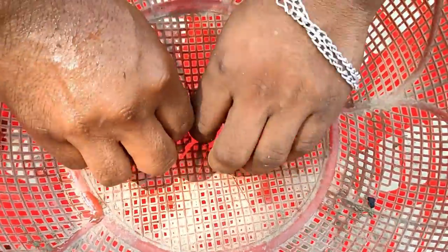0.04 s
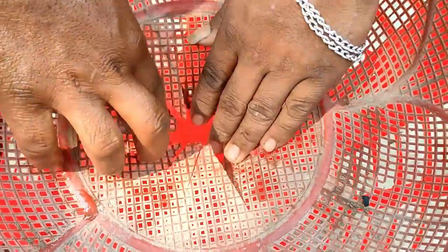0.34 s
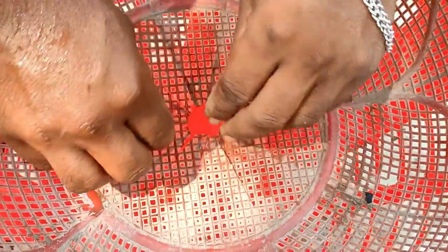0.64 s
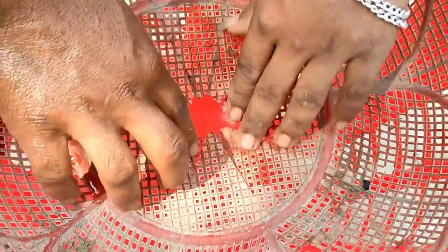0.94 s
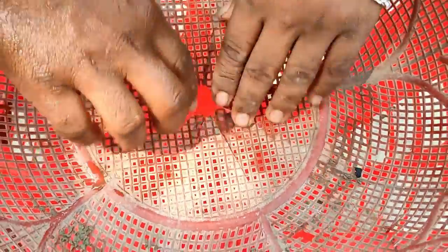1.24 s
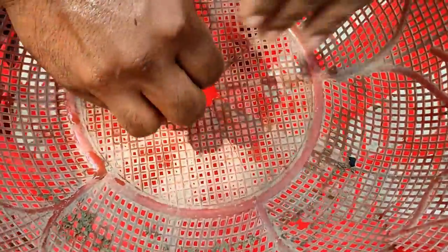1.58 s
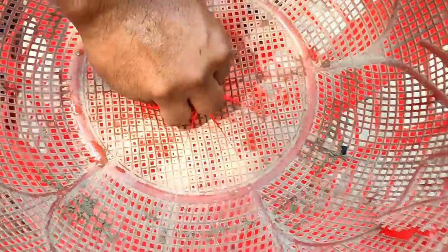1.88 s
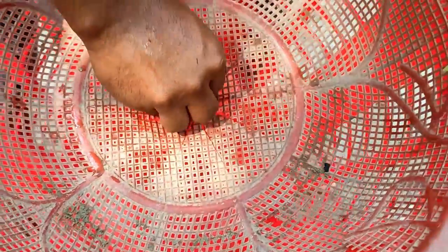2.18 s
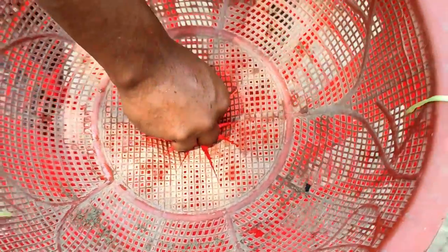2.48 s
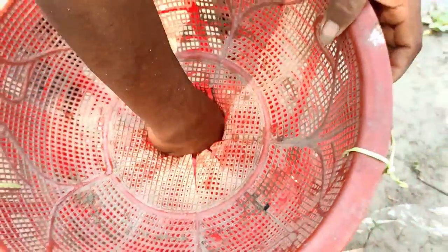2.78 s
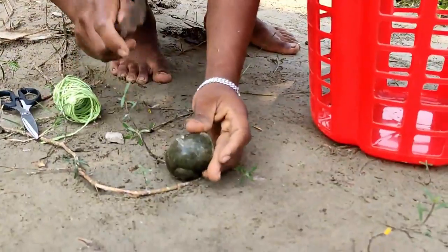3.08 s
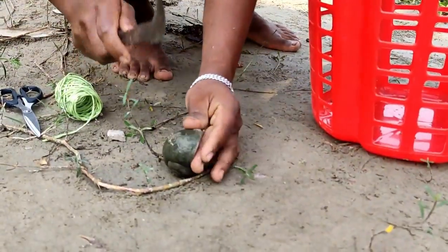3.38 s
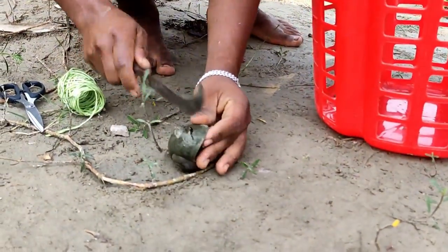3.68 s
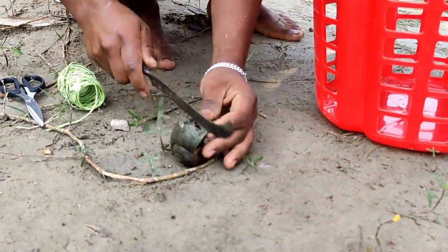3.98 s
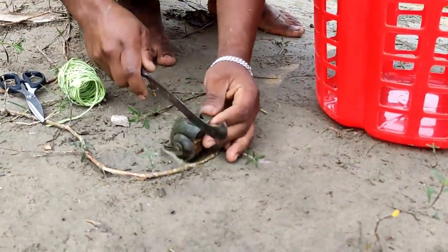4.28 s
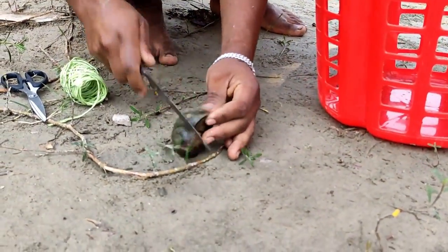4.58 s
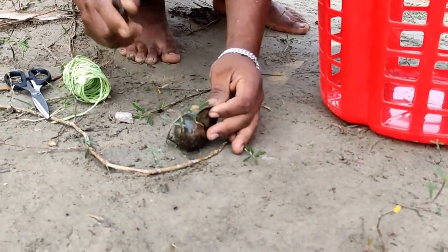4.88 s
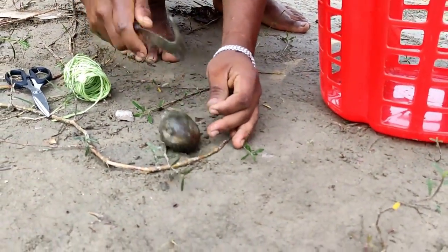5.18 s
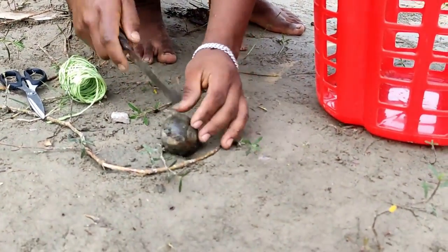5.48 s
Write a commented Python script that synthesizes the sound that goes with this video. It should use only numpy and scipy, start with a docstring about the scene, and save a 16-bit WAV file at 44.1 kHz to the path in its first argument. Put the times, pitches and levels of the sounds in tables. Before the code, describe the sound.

A hand brushes over the mesh of a plastic basket while snail shells click, scrape and bump inside it. Then a knife strikes a shell on bare earth six times at an even pace, each blow a loud, sharp crack with a brief ring and a thud. A few light ticks follow. The action is close to the microphone, outdoors, over a low murmur, a few faint birds and one faint, distant horn.

```python
"""First a hand rummages in a plastic basket for a snail shell: it brushes the mesh, and shells click,
scrape and bump. A far horn sounds as the hand lifts the shell out. From about 3 s a knife strikes the
shell six times on bare earth: each blow is a burst of tiny fractures, a short ring, a thud and a bright
fading tail. The shell scuffs the soil between the later blows. Last come two bright ticks of shell chips
and two light touches of the blade. Behind it all lie a low outdoor murmur and a few faint birds."""
import sys
import numpy as np
from scipy import signal
from scipy.fft import rfft, irfft
from scipy.io import wavfile
from scipy.ndimage import uniform_filter1d

SR = 44100
rng = np.random.default_rng(int(sys.argv[2]) if len(sys.argv) > 2 else 0)


def bounce(signal):
    """Save signal as a 16-bit WAV file at the path given by the first command-line argument."""
    frames = np.transpose(np.atleast_2d(signal))
    limited = np.clip(frames, -1, 1)
    pcm = np.round(limited * 32767).astype(np.int16)
    wavfile.write(sys.argv[1], SR, pcm)


N = 244314

# tone of the basket's clicks, also the starting tone of every scrape: pitch_hz, level_db
KNOCK_TONE = [(40, -23.5), (120, 13), (280, 9.5), (420, 9.5), (550, 8.5), (750, 1.5), (1250, 4.5),
              (2400, -4), (4000, 0), (7000, -12), (12000, -6.5), (16000, -19.5)]


def knife_blows(lead_s=.012, give_s=0.00162, give_db=-11, scatter_db=-27, scatter_s=0.0191,
                uneven_db=2.5, thud_s=0.00238, chips_db=-18):
    """The shell gives way, cracks and rings; the earth under it thuds and the surroundings echo."""
    # each blow: start_s, crack_db, crumble_s, hollow_db, low_hz and high_hz (favoured by the struck spot),
    # ring_db, thud_db, thud_hz, thud_pan_db, tail_db, dullness (on the right, 0 to 1)
    strikes = [(3.0858, -1.16, 0.002547, 5.5, 1202, 11610, -3, -10.5, 108, 6, -2.5, 0),
               (3.4295, 1, 0.00427, 0.5, 1720, 11670, -1, -9, 102, 7, -1.5, 0.035),
               (3.7893, 1.85, 0.00272, -4, 1896, 6900, -4, -16, 135, 9, -7.5, 0.319),
               (4.1175, 2.5, 0.00283, -8, 2901, 3052, 0, -15.5, 140, 19, -6.5, 0.72),
               (4.4438, 1.67, 0.00398, 1.5, 1374, 2538, -2, -18.5, 135, 14, -6, 0.89),
               (4.7856, -2.5, 0.0035, 0, 1415, 2197, 3, -15.5, 150, 10, -4, 1)]
    # tone of a fracture: pitch_hz, level_db
    crack_tone = [(60, -30.5), (250, 14), (480, 4), (800, 14), (1900, 9), (2600, 8.5), (3800, 8.5),
                  (5200, 11.5), (7500, 10), (10000, 8.5), (16000, -1)]
    # tone on each side: pitch_hz, left_db, right_db, dulling_db (added on the right at full dullness)
    side_tone = [(300.6, 1.5, 4, -1.5), (755, -2, -1.5, 5.5), (1305, -1.5, -3, 4), (2860, 0.5, 0.5, 4),
                 (4900, 0.5, 1.5, -3), (7290, -1.5, 4, -21.5), (8760, 9, -7.5, -7.5), (10260, -4, 8, -32),
                 (12560, 2.5, 13, -41.5), (16100, 2, 6, 5)]
    out = np.zeros((2, N))
    t = np.arange(SR * 3 // 5) / SR - lead_s  # zero is the moment the shell breaks
    early = t[:SR // 12]
    for (start_s, crack_db, crumble_s, hollow_db, low_hz, high_hz,
         ring_db, thud_db, thud_hz, thud_pan_db, tail_db, dullness) in strikes:
        giving = gain_of(give_db) * np.exp(-abs(early) / give_s)
        crumbling = np.exp(-abs(early) / crumble_s) + gain_of(scatter_db) * np.exp(-abs(early) / scatter_s)
        crack = burst(np.where(early < 0, giving, crumbling))
        crack = np.pad(crack, ((0, 0), (0, len(t) - len(early))))
        chips = colour(falling_chips(t, chips_db + tail_db), lambda f: 20 * (treble(f, 2000) - 1))
        hit = crack + echo_tail(crack, tail_db) + chips
        hit = colour(hit, lambda f: crack_db + look_up(crack_tone, f) + uneven_db * treble_ripple(f))
        hit += gain_of(ring_db) * shell_ring(t, low_hz, high_hz)

        def sides_db(f):
            left = look_up(side_tone, f)
            right = look_up(side_tone, f, column=2) + dullness * look_up(side_tone, f, column=3)
            return hollow_db * hump(f, centre_hz=1051.2, octaves=0.662) + np.array([left, right])

        thud = -np.sin(2 * np.pi * thud_hz * t) * np.exp(-abs(t) / thud_s)
        add(out, start_s - lead_s, colour(hit, sides_db) + gain_of(thud_db) * panned(thud_pan_db) * thud)
    return out


def shell_ring(t, low_hz, high_hz, favour_db=8, spot_octaves=0.0346):
    """The shell rings at its own pitches; those that the struck spot favours get a boost."""
    # the shell's own notes: pitch_hz, level_db, fade_s (time to fall by 60 dB)
    notes = [(194.7, -30.5, 0.0598), (751.1, -26, 0.0295), (1222.3, -25.5, 0.0222), (1350.5, -28, 0.0517),
             (1728.3, -35, 0.036), (1888.4, -36.5, 0.099), (2212.6, -27, 0.0316), (2512, -22.5, 0.0333),
             (2967, -26, 0.0393), (3235, -25.5, 0.02838), (3539, -41.5, 0.053), (4804, -28.5, 0.054),
             (5080, -40.5, .04), (6840, -38, .045), (8699, -30, .02), (9940, -37.5, .04), (10570, -40, .04),
             (11846, -33.5, 0.045), (12294, -30, 0.0256)]
    hz, db, fade_s = np.transpose(notes)[:, :, None]
    age = np.maximum(t, 0)
    favour = hump(hz, low_hz, spot_octaves) + hump(hz, high_hz, spot_octaves)
    level = gain_of(db + favour_db * favour) * fade(age, fade_s) * (t > 0)
    # low notes reach both sides in step, high notes do not
    phase = rng.random((len(notes), 1))
    side_shift = rng.uniform(-0.765, 1, (2, len(notes), 1)) * np.minimum(hz / 9000, .5)
    return (level * np.sin(2 * np.pi * (hz * age + phase + side_shift))).sum(1)


def treble_ripple(hz, width_hz=130, above_hz=3000):
    """Narrow random peaks and dips that make each crack's treble uneven."""
    points_hz = np.arange(0, SR, width_hz)
    heights = evened(rng.standard_normal(SR // 50 + 1))[:len(points_hz)]
    return np.interp(hz, points_hz, heights) * treble(hz, above_hz)


def falling_chips(t, db, per_s=260, peak_s=0.03525):
    """Tiny chips of shell patter down after a blow."""
    clicks = rng.standard_normal((2, len(t))) * (rng.random(len(t)) < per_s / SR)
    chips = clicks * np.maximum(t, 0) * np.exp(-t / peak_s)
    return gain_of(db) * chips / (np.linalg.norm(chips[0]) + 1e-12)


def echo_tail(hit, tail_db, rise_s=0.014):
    """Scattered copies of a blow gather into a bright tail whose treble dies first."""
    # the tail's tone and length: pitch_hz, level_db, fade_s (time to fall by 60 dB)
    bands = [(201.6, -30, 0.68), (1300.7, -19, 0.42), (2638, -5.5, 0.439), (5120, -12.5, 0.445),
             (9044, -11, 0.419), (15000, -10.5, 0.318)]
    size = hit.shape[1]
    hz, times, spectrum = signal.stft(grains(size, 2.5), SR, nperseg=256)
    spectrum *= fade(times, look_up(bands, hz, column=2)[:, None])
    tail = signal.istft(spectrum, SR, nperseg=256)[1][:, :size]
    tail *= 1 - np.exp(-np.arange(size) / SR / rise_s)
    tail = colour(tail / np.linalg.norm(tail[0]), lambda f: look_up(bands, f) + tail_db)
    return signal.fftconvolve(hit, tail, axes=1)[:, :size]


def light_ticks(click_db=-3, click_s=0.0034, away_db=-24):
    """Two bright ticks of shell chips, then two light touches of the blade; each clicks and rings."""
    # each tick: start_s, level_db, low_hz and high_hz (the favoured pitches), reach_octaves
    ticks = [(4.861, -22, 8650, 8650, .6), (4.901, -20, 8650, 9900, .8), (5.0646, -28, 3263, 3254, .4),
             (5.228, -15, 1300, 2400, 2.2)]
    out, t = np.zeros((2, N)), np.arange(SR // 8) / SR
    for start_s, db, low_hz, high_hz, reach_octaves in ticks:
        tick = shell_ring(t, low_hz, high_hz) + gain_of(click_db) * burst(np.exp(-t / click_s))
        middle_hz = np.sqrt(low_hz * high_hz)
        add(out, start_s, colour(tick, lambda f: db + away_db * (1 - hump(f, middle_hz, reach_octaves))))
    return out


def basket_taps(click_s=0.00372, rise_s=0.000474, rattle_db=-19, rattle_s=0.01822,
                knock_hz=280, knock_db=-18, pan_db=-0.04):
    """Shells click on the mesh, with a brief rattle and a soft knock of the basket's floor."""
    # each click: start_s, level_db, treble_db
    taps = [(.065, -10, 1), (.109, -5.5, -15), (.152, -12.5, 3.5), (.197, -22, 9.5), (.26, -5, -15.5),
            (.358, -19.5, 8), (.385, -15, 15.5), (.414, 1.5, 7.5), (.423, 0, -9), (.775, -4.5, -2.5),
            (.807, -9, 12), (.894, -11.5, 8.5), (.905, -9, -5), (1.0327, -33, 36), (1.2131, -10.5, -9),
            (1.364, -14, 1.5), (1.38, -14, 3), (1.686, -8.5, 1), (1.815, -9.5, -23.5), (1.858, -10, -14),
            (2.043, -11.5, -10), (2.444, -7.5, -0.5), (2.8277, -9, 1.5)]
    out, t = np.zeros((2, N)), np.arange(SR // 8) / SR
    dying = np.exp(-t / click_s) + gain_of(rattle_db) * np.exp(-t / rattle_s)
    envelope = dying * (1 - np.exp(-t / rise_s))
    for start_s, db, treble_db in taps:
        def tone_db(f):
            # the mesh yields, so light and hard taps push its floor about equally
            floor_db = (knock_db - db) * hump(f, knock_hz, octaves=1)
            return db + look_up(KNOCK_TONE, f) + floor_db + treble_db * treble(f)

        add(out, start_s, panned(pan_db) * colour(burst(envelope), tone_db))
    return out


def basket_bumps(rise_s=0.00121):
    """The basket's floor bends and rings briefly, at a pitch set by where it is pressed."""
    # each hollow bump: start_s, level_db, pitch_hz, fade_s (time to fall by 60 dB)
    bumps = [(0.109, -27.5, 134.4, 0.047), (.11, -31.5, 718, 0.032), (.112, -40.5, 370.3, 0.164),
             (.355, -34, 234.3, 0.116), (.435, -36, 548.4, 0.198), (.465, -33.5, 364, 0.115),
             (.778, -37, 498.6, 0.0557), (1.214, -24.5, 762, 0.0178), (1.245, -37.5, 537.4, 0.0696),
             (1.592, -32.5, 334.5, 0.0302), (1.70, -35.5, 530.4, 0.128), (1.816, -38, 497, 0.0565)]
    out, t = np.zeros((2, N)), np.arange(SR // 6) / SR
    for start_s, db, hz, fade_s in bumps:
        ring = np.sin(2 * np.pi * hz * t) * fade(t, fade_s) * (1 - np.exp(-t / rise_s))
        add(out, start_s, gain_of(db) * np.array([ring, ring]))
    return out


def scrapes():
    """A shell drags over the mesh and scuffs the soil; the blade skids off it once."""
    # shell on mesh: start_s, length_s, level_db, treble_db
    drags = [(0.045, 0.0995, -45, -3), (0.427, 0.0683, -32, 7), (0.897, 0.0376, -48.5, -8.5),
             (1.223, 0.0459, -38.5, 6.5), (1.68, 0.0751, -38, 3), (1.778, 0.133, -50.5, -27),
             (2.008, 0.172, -53, -17), (2.421, 0.0813, -44.5, -8), (2.76, 0.055, -50.5, 5.5)]
    # shell on soil: start_s, length_s, level_db
    scuffs = [(4.19, .09, -48), (4.287, 0.0962, -41), (4.379, .032, -39), (4.396, 0.0365, -30),
              (4.484, .073, -42), (4.578, 0.374, -50.5), (4.945, 0.1046, -47)]
    # blade on shell: start_s, length_s, level_db, treble_db, pan_db
    skid = (3.5, 0.0021, -32, 23, -8)
    out = np.zeros((2, N))
    for drag in drags:
        add_scrape(out, *drag, pan_db=0.62)
    for scuff in scuffs:
        add_scrape(out, *scuff, treble_db=-31.5, pan_db=-23)  # dull, and to the right
    add_scrape(out, *skid)
    return out


def add_scrape(mix, start_s, length_s, db, treble_db, pan_db, ridges_per_s=140, catch=.7):
    """Many tiny slips catch on ridges, swell quickly and fade as the stroke stops."""
    t = np.arange(SR * 2 // 5) / SR
    progress = np.minimum(t / length_s, 1)
    swell = abs(np.sin(np.pi * progress ** 0.633))
    speed = np.exp(.5 * evened(uniform_filter1d(rng.standard_normal(len(t)), size=300)))
    ridges_passed = np.cumsum(ridges_per_s * speed) / SR
    slips = grains(len(t), spread_db=4.5) * (1 - catch * (ridges_passed % 1))
    slips = evened(colour(slips, lambda f: look_up(KNOCK_TONE, f) + treble_db * treble(f)))
    add(mix, start_s, gain_of(db) * panned(pan_db) * slips * swell)


def hand_brushing(rise_s=0.029, release_s=0.049, lift_s=2.95, resting_db=-77,
                  rub_boost_db=2, hiss_boost_db=3, hiss_pan_db=-3):
    """The hand brushes over the mesh in strokes: a soft rub and a fine hiss."""
    # each stroke, before the boosts: start_s, length_s, rub_db, hiss_db
    brushes = [(-.03, 0.257, -57, -77), (0.401, 0.067, -54, -59), (0.617, 0.121, -63, -79.5),
               (1.039, 0.323, -64.5, -73), (1.706, 0.182, -60, -67), (1.992, 0.126, -57.5, -64),
               (2.129, 0.1505, -67.5, -61), (2.339, 0.0764, -54, -59), (2.422, 0.0754, -60, -51.5),
               (2.52, 0.1216, -57.5, -48.5), (2.651, 0.0826, -65, -52.5), (2.861, .04, -54, -53),
               (2.95, .1, -62.5, -67.5)]
    # tones of the rub and the hiss: pitch_hz, level_db
    rub_tone = [(300, -15.5), (1200, 5.5), (2500, 4.5), (4500, 4), (7000, -6.5)]
    hiss_tone = [(3000, -15), (5500, -5.5), (7300, -8.5), (9000, 2.5), (10500, -6.5), (12000, 4),
                 (14000, -12), (16000, -8)]
    start_s, length_s, rub_db, hiss_db = np.transpose(brushes)[:, :, None]
    t = np.arange(N) / SR
    # a stroke gathers speed, holds, then dies away
    strokes = np.clip((t - start_s) / rise_s, 0, 1)
    strokes *= np.exp(-np.maximum(t - start_s - length_s, 0) / release_s)
    # until it lifts, the hand never lies quite still
    resting = gain_of(resting_db) * np.exp(-np.maximum(t - lift_s, 0) / release_s)
    rub_level = np.linalg.norm(strokes * gain_of(rub_db), axis=0)
    hiss_level = np.hypot(np.linalg.norm(strokes * gain_of(hiss_db), axis=0), resting)
    rub = rub_level * evened(colour(grains(N, spread_db=5.8), lambda f: look_up(rub_tone, f)))
    hiss = hiss_level * panned(hiss_pan_db) * steady_noise(hiss_tone)
    return gain_of(rub_boost_db) * rub + gain_of(hiss_boost_db) * hiss


def close_echoes(x):
    """The ground, hands and basket wall repeat each sound within milliseconds."""
    # each echo: left_delay_s, right_delay_s, level_db
    echoes = [(.0013, 0.0019, -24), (.0036, 0.0036, -13.5), (.0064, 0.008, -20)]
    out = x.copy()
    for left_s, right_s, db in echoes:
        add(out, left_s, gain_of(db) * x * [[1], [0]])
        add(out, right_s, gain_of(db) * x * [[0], [1]])
    return out * np.linalg.norm(x) / np.linalg.norm(out)


def outdoor_air(murmur_db=-56, hiss_db=-61):
    """A low murmur and a far hiss that never stop."""
    # tones of the murmur and the hiss: pitch_hz, level_db
    murmur_tone = [(20, -29.5), (40, -25), (65, -13.5), (105, 2.5), (200, -0.5), (360, -3.5), (600, -13.5),
                   (1000, -38.5), (1600, -35), (3300, -59.5)]
    hiss_tone = [(700, 9.5), (1500, 8), (3500, 3.5), (5000, -2.5), (8500, -2), (12000, -12.5), (16000, -7)]
    murmur = gain_of(murmur_db) * steady_noise(murmur_tone, size=2048)
    return murmur + gain_of(hiss_db) * steady_noise(hiss_tone)


def far_birds(width_hz=300):
    """Short chirps, blurred by distance into narrow bands of noise."""
    # each chirp: start_s, length_s, pitch_hz, level_db
    chirps = [(0.543, 0.06, 2640, -61.5), (0.609, .11, 3550, -60.5), (1.133, 0.052, 2408, -58),
              (1.492, .09, 2385, -61.5), (5.498, 0.0494, 4430, -66)]
    out = np.zeros((2, N))
    smoothing = signal.butter(2, width_hz / 2, fs=SR, output="sos")
    for start_s, length_s, hz, db in chirps:
        size = round(length_s * SR)
        blur = evened(signal.sosfilt(smoothing, rng.standard_normal((2, size))))
        chirp = evened(blur * np.sin(2 * np.pi * hz * np.arange(size) / SR))
        add(out, start_s, gain_of(db) * chirp * np.hanning(size))
    return out


def far_horn(start_s=2.74, length_s=0.643, pan_db=-2.4):
    """One faint horn note swells and fades."""
    # the note and its octave: pitch_hz, level_db
    tones = [(845, -67), (1690, -63.5)]
    out, t = np.zeros((2, N)), np.arange(round(length_s * SR)) / SR
    horn = sum(gain_of(db) * np.sqrt(2) * np.sin(2 * np.pi * hz * t) for hz, db in tones)
    add(out, start_s, panned(pan_db) * horn * np.hanning(len(t)))
    return out


def steady_noise(tone, size=1024):
    """Noise of a given tone with gently drifting patches, alike on both sides in the bass."""
    # how alike left and right are: pitch_hz, likeness (0 to 1)
    side_likeness = [(60, 0.804), (300, 0.75), (640, 0.468), (1400, 0), (3000, 0)]
    hz = np.fft.rfftfreq(size, 1 / SR)
    a, b, c, d, patches = rng.standard_normal((5, N * 4 // size + 5, len(hz)))
    patches = uniform_filter1d(patches, size=8, axis=0)
    patches_db = 2 * evened(uniform_filter1d(patches, size=8, axis=1))
    likeness = look_up(side_likeness, hz)
    left = a + 1j * b
    right = likeness * left + np.sqrt(1 - likeness ** 2) * (c + 1j * d)
    spectrum = np.array([left, right]) * gain_of(look_up(tone, hz) + patches_db)
    noise = signal.istft(spectrum.transpose(0, 2, 1), nperseg=size, noverlap=size * 3 // 4)[1]
    return evened(noise[:, :N])


def grains(size, spread_db):
    """Stereo noise made of clicks of uneven size."""
    noise = rng.standard_normal((2, size))
    unevenness = 3 * uniform_filter1d(rng.standard_normal(size), size=9)
    return evened(noise * gain_of(spread_db * unevenness))


def burst(envelope, spread_db=2, passes=3):
    """Clicks that follow a loudness curve, with energy 1 on each side and all pitches about equal."""
    x = grains(len(envelope), spread_db) * envelope
    for _ in range(passes):
        spectrum = rfft(x)
        x = irfft(spectrum / (abs(spectrum) + 1e-12), len(envelope))  # level the pitches
        x *= envelope / np.sqrt(abs(uniform_filter1d(x ** 2, size=65)) + 1e-14)  # restore the curve
    return x / np.linalg.norm(x, axis=1, keepdims=True)


def colour(x, curve_db, size=4096):
    """Turns each pitch up or down by curve_db(hz), with no ringing ahead of the sound."""
    hz = abs(np.fft.fftfreq(size, 1 / SR))
    log_gain = np.log(gain_of(curve_db(hz)))
    response = np.fft.ifft(np.exp(np.conj(signal.hilbert(log_gain)))).real[..., :size // 2]
    return signal.fftconvolve(x, np.atleast_2d(response), axes=1)[:, :x.shape[1]]


def look_up(points, hz, column=1):
    """A table's value at any pitch, on straight lines between its rows along a musical scale."""
    table = np.array(points, float)
    return np.interp(np.log(hz + 1), np.log(table[:, 0] + 1), table[:, column])


def hump(hz, centre_hz, octaves):
    """A bell shape: 1 at the centre pitch, 0 far from it."""
    return np.exp(-.5 * (np.log2((hz + 1) / centre_hz) / octaves) ** 2)


def treble(hz, corner_hz=4500):
    """Rises from 0 at low pitches to 1 at high ones."""
    return hz ** 2 / (hz ** 2 + corner_hz ** 2)


def fade(t, fade_s):
    """Falls by 60 dB every fade_s seconds."""
    return np.exp(-np.log(1000) * t / fade_s)


def gain_of(db):
    """Turns decibels into a multiplier."""
    return 10 ** (np.asarray(db) / 20)


def evened(x):
    """Scales to an average power of 1."""
    return x / np.sqrt(np.mean(x ** 2) + 1e-20)


def panned(db):
    """Left and right gains; the left is db louder, at the same total power."""
    return evened(gain_of([[db / 2], [-db / 2]]))


def add(mix, start_s, sound):
    """Mixes a stereo sound in at start_s."""
    part = mix[:, max(round(start_s * SR), 0):][:, :sound.shape[1]]
    part += sound[:, :part.shape[1]]


def scene():
    """Close knife work and rummaging over the outdoor background."""
    close = knife_blows() + light_ticks() + basket_taps() + scrapes() + hand_brushing()
    return close_echoes(close) + basket_bumps() + outdoor_air() + far_birds() + far_horn()


def record(dry, low_cut_hz=35, high_cut_hz=15850):
    """The microphone sheds the deepest bass; peaks are clipped at full scale; the top treble is cut."""
    x = signal.sosfilt(signal.butter(1, low_cut_hz, "high", fs=SR, output="sos"), dry)
    treble_cut = signal.firwin(255, high_cut_hz, window=("kaiser", 9), fs=SR)
    return signal.oaconvolve(np.clip(x, -1, 1), treble_cut[None], "same")


dry = scene()
out = record(dry)
bounce(out)
```